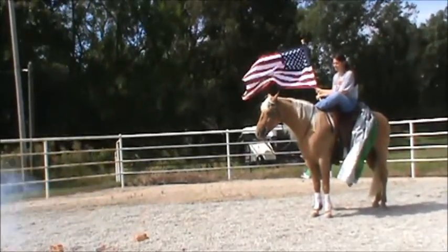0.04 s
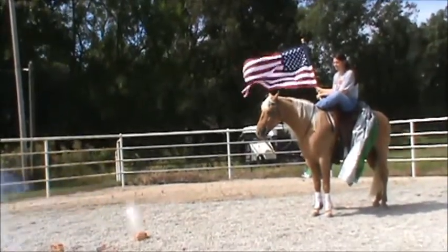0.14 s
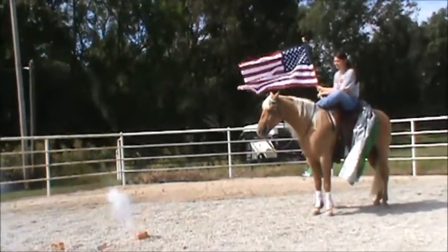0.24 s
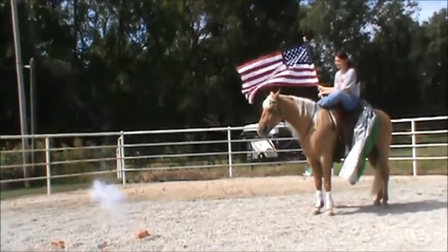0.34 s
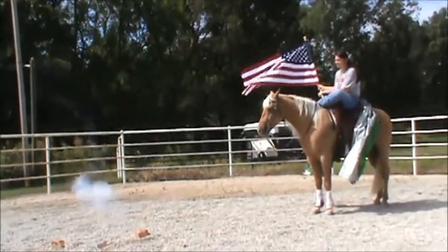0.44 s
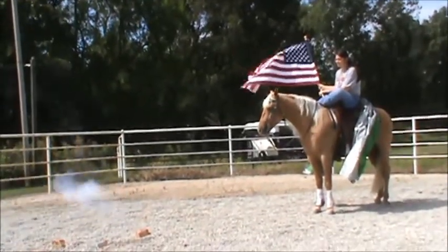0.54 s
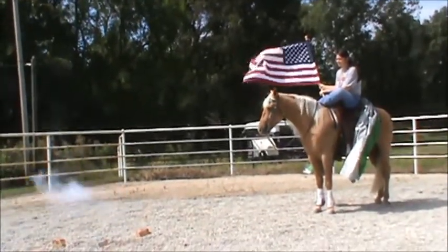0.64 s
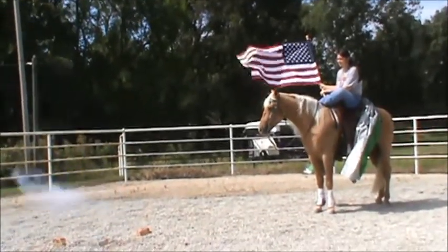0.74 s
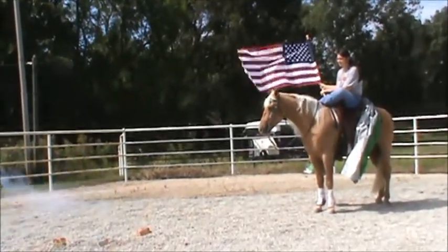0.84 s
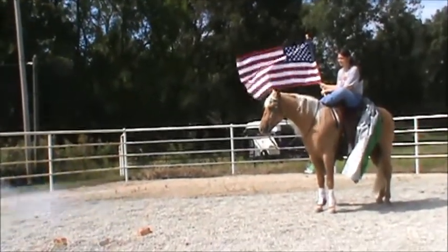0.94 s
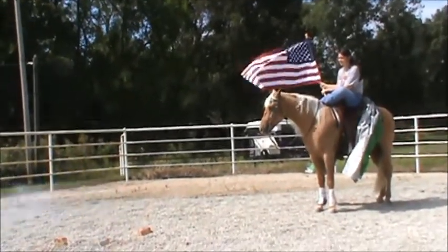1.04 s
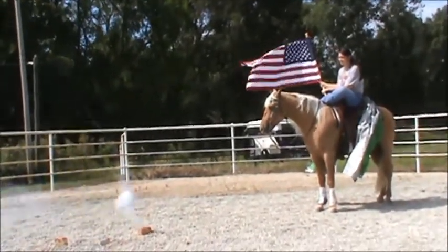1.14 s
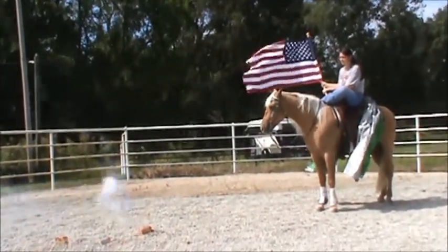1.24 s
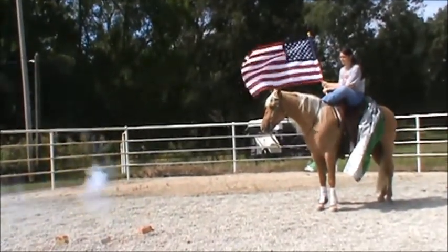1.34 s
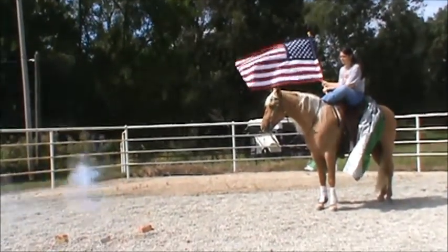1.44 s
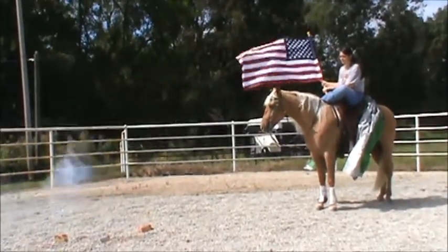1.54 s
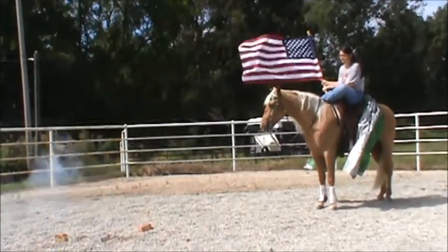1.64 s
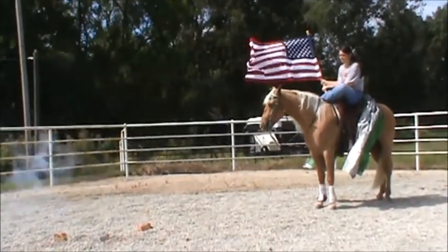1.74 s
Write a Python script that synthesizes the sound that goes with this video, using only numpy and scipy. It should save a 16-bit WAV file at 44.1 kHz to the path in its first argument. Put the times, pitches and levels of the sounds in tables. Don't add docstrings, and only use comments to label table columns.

```python
import sys
import numpy as np
from scipy import signal
from scipy.fft import rfft, irfft, next_fast_len
from scipy.io import wavfile
from scipy.ndimage import uniform_filter1d, minimum_filter1d

SR = 44100
rng = np.random.default_rng(int(sys.argv[2]) if len(sys.argv) > 2 else 0)


def undo_db(level):
    steps = np.asarray(level, float) / 20
    return 10 ** steps


def materialize(psi):
    bounded = np.clip(np.atleast_2d(psi).T, -1, 1)
    quanta = np.round(bounded * 32767).astype(np.int16)
    wavfile.write(sys.argv[1], SR, quanta)


N = 77175


def evened(x):
    return x / np.sqrt(np.mean(x ** 2) + 1e-20)


def read(points, hz):
    f, value = np.transpose(points)
    return np.interp(np.log(hz + 1), np.log(f + 1), value)


def colour(x, gain):
    size = next_fast_len(x.shape[-1] + 4096)
    spectrum = rfft(x, size) * gain(np.fft.rfftfreq(size, 1 / SR))
    return irfft(spectrum, size)[..., :x.shape[-1]]


def slow(hz, size):
    return evened(colour(rng.standard_normal(size), lambda f: np.exp(-(f / hz) ** 2)))


def pair(points, same, seeds):
    def likeness(f):
        return np.clip(same(f), -1, 1)

    own = colour(seeds[1], lambda f: np.sqrt(1 - likeness(f) ** 2))
    right = colour(seeds[0], likeness) + own
    both = np.array([seeds[0], right])
    return evened(colour(both, lambda f: undo_db(read(points, f)) * (f > points[0][0])))


def sides(pan_db):
    return undo_db(np.outer([.5, -.5], pan_db))


def add(mix, s, sound, pan_db=0):
    part = mix[:, round(s * SR):][:, :sound.shape[-1]]
    part += sound * sides(pan_db)


def field():
    # frequency in Hz, leaf hiss level in dB.
    leaf_spectrum = [(350, -51), (600, -20.5), (1660, -5.5), (2370, -13.5), (2870, -12), (3940, -20),
                     (6640, -20), (11200, -11.5), (16000, -30.5)]
    insect_hz, insect_width_hz = 2900, 170
    insect = colour(rng.standard_normal(N), lambda f: np.exp(-((f - insect_hz) / insect_width_hz) ** 2))
    leaves = pair(leaf_spectrum, lambda f: 0.79 + 0 * f, rng.standard_normal((2, N)))
    leaves_gain = undo_db(-44.5 + slow(9.2, N))
    insect_gain = undo_db(-51.5 + 2 * slow(20, N))
    return leaves_gain * leaves + insect_gain * evened(insect)


def wind():
    # time in seconds, wind level in dB.
    gusts = [(0, -32), (.1, -40.5), (0.192, -33.5), (.4, -39.5), (0.548, -41), (0.651, -21.5), (.78, -35.5),
             (.87, -24), (.93, -28.5), (1.001, -26.5), (1.15, -23.5), (1.22, -28.5), (1.3, -30),
             (1.45, -31.5), (1.6, -19), (1.701, -27.5), (1.75, -19)]
    # time in seconds, level of a single buffet in dB.
    buffets = [(0.049, -33), (0.088, -27.5), (0.597, -21), (0.649, -37), (0.85, -22), (0.884, -12),
               (0.942, -58), (0.982, -13.5), (1.009, -13.5), (1.046, -11), (1.07, -17.5), (1.111, -40),
               (1.138, -18.5), (1.588, -12), (1.615, -20), (1.741, -9)]
    # frequency in Hz, wind spectrum in dB per Hz.
    spectrum = [(15, -43), (25, -26), (54, -9), (124, -5), (271, -11), (325, -17), (465, -22.5), (549, -28),
                (900, -31), (1170, -36), (1980, -120)]
    # frequency in Hz, left-right likeness from 0 to 1.
    likeness = [(40, 0.87), (130, 1), (290, 0.62), (600, 1)]
    # frequency in Hz, phase in radians by which the right port leads.
    port_phase = [(25, .5), (60, .7), (125, 1.05), (250, 1.2), (600, 1.2)]
    puffs_per_s, puff_spread_db, wash_db, buffet_db = 400, 3, -3, 19.5
    lump_db, lump_hz = 4, 31

    puff_levels = undo_db(puff_spread_db * np.minimum(rng.exponential(1, (2, N)), 3))
    puffs = puff_levels * (rng.random((2, N)) < puffs_per_s / SR)
    seeds = evened(puffs) + undo_db(wash_db) * rng.standard_normal((2, N))
    seeds = evened(seeds * undo_db(lump_db * slow(lump_hz, N)))
    s, db = np.transpose(gusts)
    seeds *= undo_db(np.interp(np.arange(N) / SR, s, db))
    for at, peak_db in buffets:
        seeds[0, round((at + .004) * SR)] += undo_db(peak_db + buffet_db)
    left, right = pair(spectrum, lambda f: read(likeness, f), seeds) * np.sqrt(np.mean(seeds[0] ** 2))
    left = colour(left, lambda f: np.exp(-.5j * read(port_phase, f)))
    right = colour(right, lambda f: np.exp(.5j * read(port_phase, f)))
    return np.array([left, right])


def trees(x, low):
    # frequency in Hz, time to decay by 60 dB in seconds.
    decay = [(300, 0.86), (1000, 1), (3000, 1), (8000, 0.67), (14000, 0.51)]
    # frequency in Hz, reflected level in dB.
    reflection = [(200, -3), (600, -3.5), (2000, -3), (5000, -2.5), (12000, 2.5)]
    same, tail_db, slap_db = 0.82, -19.5, -17
    slap_s, slap_spread_s = .225, 0.018

    taps = rng.standard_normal((3, SR))
    taps = same * taps[2] + np.sqrt(1 - same ** 2) * taps[:2]
    hz, t, z = signal.stft(taps, SR, nperseg=256)
    tail_gain = undo_db(read(reflection, hz)[:, None] - 60 * t / read(decay, hz)[:, None])
    tail = signal.istft(z * tail_gain, SR, nperseg=256)[1][:, :SR]
    u = np.arange(SR) / SR
    tail *= np.clip(u / 0.0074 - 1, 0, 1)
    smear = np.exp(-((u - slap_s) / slap_spread_s) ** 2)
    slap = colour(taps * smear, lambda f: undo_db(read(reflection, f)))

    answer = 0
    for source, response, db in [(x, tail, tail_db), (low, slap, slap_db)]:
        response = response / np.linalg.norm(response[0])
        heard = signal.fftconvolve(source.mean(0)[None], response, axes=1)[:, :N]
        answer = answer + undo_db(db) * heard
    return answer


def launch(s, crack_db, thump_db, fuse_db):
    # frequency in Hz, level of the bright noise in dB.
    crack_spectrum = [(800, -28), (2200, -2), (3200, 17.5), (5000, -3), (7500, 9), (10500, 15), (16000, -9)]
    crack_s, thump_s, knock_s = .0009, .0015, 0.0018
    thump_hz, knock_hz = 309, 799
    t = np.arange(0, .02, 1 / SR)
    noise = evened(colour(rng.standard_normal(len(t)), lambda f: undo_db(read(crack_spectrum, f))))
    puff = 2 * undo_db(crack_db) * t / crack_s * np.exp(-(t / crack_s) ** 2)
    crack = np.tanh(noise) * (puff + undo_db(fuse_db))
    thump = np.sin(2 * np.pi * thump_hz * t + 0.35) * t / thump_s * np.exp(1 - t / thump_s)
    knock = np.sin(2 * np.pi * knock_hz * t) * np.exp(-t / knock_s)
    return s, crack + undo_db(thump_db) * (thump + knock), 1.0


def blast(spike_db):
    spike_s = .000045
    push_hz, push_s, push_db = 1243, 0.0002, 0.5
    t = np.arange(0, .008, 1 / SR)
    front = -undo_db(spike_db) * np.sin(np.pi * np.minimum(t / spike_s / 2, 1))
    u = np.maximum(t - 2.2 * spike_s, 0)
    swing = undo_db(push_db) * np.sin(2 * np.pi * push_hz * u) * np.exp(-u / push_s) * 2
    return signal.lfilter(*signal.butter(1, 417, "high", fs=SR), front + swing)


def whistle(flight, echo_db, delay_s, growth, at_s, span_s):
    # multiple of the pitch, level at ignition in dB, share of the pan,
    # loss in dB per second as the rocket recedes.
    overtones = [(1, -2.5, 1, 0.5), (2, -12.5, 0.62, -7.5), (3, -6.5, 0.49, 27.5), (4, -11.5, -0.37, 23),
                 (5, -23, -0.32, 45)]
    # frequency in Hz, hiss level in dB.
    hiss_spectrum = [(700, -59), (1800, -16.5), (3000, -11), (3800, -12), (6000, -10), (9500, 5),
                     (12000, 0.5), (16000, -19)]
    whistle_db, flutter_db, flutter_hz, skew = 6.5, 4.5, 75.6, 0.706
    chirp, chirp_s, light_s, bloom_s = 0.0992, 0.00222, 0.00046, .004
    hiss_same, hiss_top_hz, hiss_dulling_db_per_s = .85, 8500, 45

    s, hz, db, pan_db, hiss_db = np.transpose(flight)
    t = np.arange(s[0] - .001, s[-1], 1 / SR)
    u = t - t[0]
    size = len(t)
    pan_db = np.interp(t, s, pan_db)
    bend = 1 + chirp * np.exp(-u / chirp_s) + 0.0075 * slow(126, size) + 0.00301 * slow(30, size)
    turn = 2 * np.pi * np.cumsum(np.interp(t, s, hz) * bend) / SR
    late = np.interp(u - delay_s - growth * u, u, turn)
    echo = undo_db(echo_db) * (0.17 + 0.34 * np.exp(-((u - at_s) / span_s) ** 4))

    even_fade = np.minimum(u[::-1] / .03, 1) ** 2
    bloom = np.minimum(0.46 + u / bloom_s, 1)
    shared = slow(flutter_hz, size)
    tone = 0
    for k, ignition_db, pan_share, loss_db in overtones:
        wave = np.cos(k * turn + skew * k * k) + echo * np.cos(k * late + skew * k * k)
        if k % 2 == 0:
            wave = wave * even_fade
        if k > 1:
            wave = wave * bloom
        flutter = 0.54 * shared + 0.84 * slow(flutter_hz, size)
        level_db = 4 + ignition_db - loss_db * u - flutter_db * flutter ** 2 / 2
        tone = tone + wave * sides(pan_share * pan_db) * undo_db(level_db)

    common, *own = rng.standard_normal((3, size))
    hiss = hiss_same * common + np.sqrt(1 - hiss_same ** 2) * np.array(own)
    hiss = evened(colour(hiss, lambda f: undo_db(read(hiss_spectrum, f))))
    body = colour(hiss, lambda f: 1 / (1 + (hiss_top_hz / (f + 1)) ** 6))
    hiss -= body * (1 - undo_db(-hiss_dulling_db_per_s * u))
    hiss *= undo_db(np.interp(t, s, hiss_db) + 1.2 * slow(210, size))
    hiss *= 1 + .5 * np.cos(turn)

    shape = np.minimum(np.minimum(u / light_s, 1), u[::-1] / 0.012)
    shape *= undo_db(np.interp(t, s, db) + whistle_db)
    return t[0], shape * (tone + hiss)


def scene():
    # time in seconds, pitch in Hz, level in dB, left-right difference in dB,
    # hiss level in dB.
    flights = [
        [(0.218, 3102, -6.5, 2, -9.5), (0.288, 3018, -12, 5.5, -11.5), (0.406, 2681, -10.5, 4.0, -11),
         (0.498, 2551, -13.5, 5, -10), (0.542, 2452, -29, 9, -3), (0.57, 2446, -18.5, 3, -27),
         (0.612, 2450, -24, 7, -25), (0.64, 2745, -26.5, 1, -4.5), (0.655, 2860, -42, 13, -7)],
        [(1.173, 3150, -20, 4.5, -11.5), (1.189, 3146, -17.5, 2.0, -15), (1.205, 3140, -18.5, 5, -13.5),
         (1.345, 2706, -18, 6, -10.5), (1.393, 2592, -20.5, 9, -5), (1.407, 2519, -18.5, 9, -34),
         (1.491, 2390, -19.5, 11, -1), (1.527, 2586, -29, 1, -32), (1.548, 2890, -26, 15, 1)],
    ]
    # level in dB, delay in seconds, growth in seconds per second,
    # strongest time in seconds, span in seconds.
    ground = [
        (-9, .001, .008, .15, .2),
        (-2.5, .0008, .0175, .105, .06),
    ]
    # start in seconds, crack level in dB, thump level in dB, fuse hiss level in dB.
    launches = [
        (0.204, -2, -8, -22.5),
        (1.1616, -2, -12.5, -32),
    ]
    # start in seconds, level in dB, left-right difference in dB.
    bursts_at = [
        (0.535, 13.5, -4.5),
        (1.3828, 12.5, 3.5),
    ]
    # delay in seconds, level in dB, spike level in dB.
    bounces_of = [
        [(.0013, -7, -6), (.0026, -10.5, 8.5), (.0057, -2, -9)],
        [(.0013, -7.5, -10), (.0027, -9, -20), (.0055, -6, -4)],
    ]
    low_flight_s, burst_trees_db = 0.14, 10

    rockets, bursts, fronts, low = np.zeros((4, 2, N))
    for flight, sand, pop in zip(flights, ground, launches):
        s, sound = whistle(flight, *sand)
        add(rockets, s, sound)
        u = np.arange(sound.shape[1]) / SR
        add(low, s, sound * np.exp(-(u / low_flight_s) ** 2))
        add(rockets, *launch(*pop))
    for (s, db, pan_db), bounces in zip(bursts_at, bounces_of):
        add(fronts, s, undo_db(db + burst_trees_db) * blast(7))
        for delay, loss_db, spike_db in [(0.00019, 0, 0)] + bounces:
            add(bursts, s + delay, undo_db(db + loss_db) * blast(spike_db), pan_db)
    return rockets + bursts + trees(rockets + fronts, low) + wind() + field()


def held(db, per_s):
    fall = np.arange(N) * per_s / SR
    return np.maximum.accumulate(db + fall) - fall


def top_cut(x):
    return signal.sosfilt(signal.butter(12, 16600, fs=SR, output="sos"), x)


def record(dry):
    knee_db, squeeze, recover_db_per_s, sense_s = -20, 0.31, 13, 0.034
    ceiling, ahead_s, release_db_per_s = 0.97, 0.0024, 902

    rate = 1 / (sense_s * SR)
    power = signal.lfilter([rate], [1, rate - 1], (dry ** 2).mean(0))
    power_db = 10 * np.log10(power + 1e-12)
    over_db = np.maximum(held(power_db, recover_db_per_s) - knee_db, 0)
    x = dry / undo_db(squeeze * uniform_filter1d(over_db, size=100))

    peak = -minimum_filter1d(-abs(x).max(0), size=2 * int(ahead_s * SR) + 1)
    peak_db = 20 * np.log10(peak / ceiling + 1e-9)
    limit_db = np.maximum(held(peak_db, release_db_per_s), 0)
    x = x / undo_db(uniform_filter1d(limit_db, size=24))
    return top_cut(x)


dry = scene()
out = record(dry)
materialize(out)
```